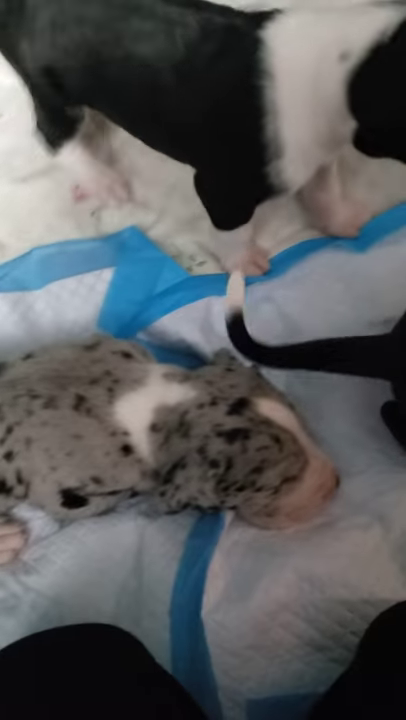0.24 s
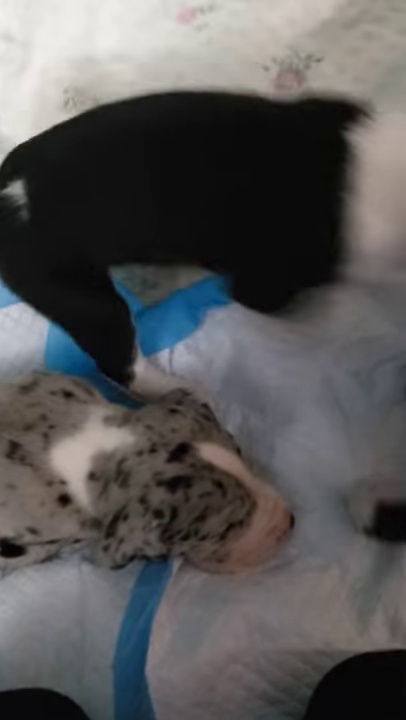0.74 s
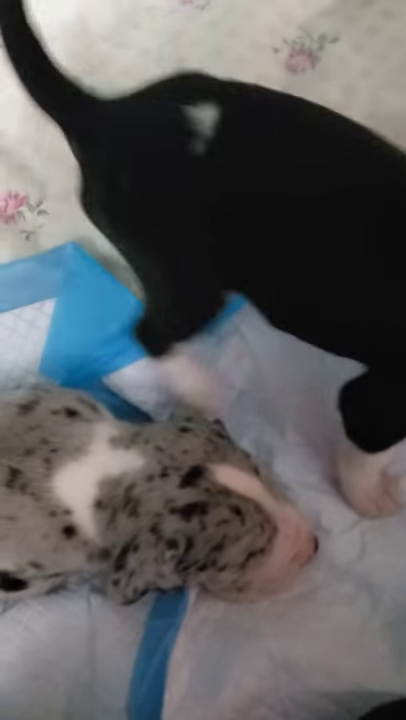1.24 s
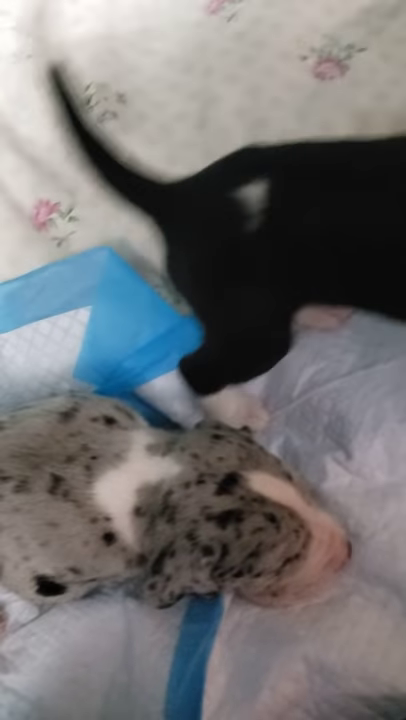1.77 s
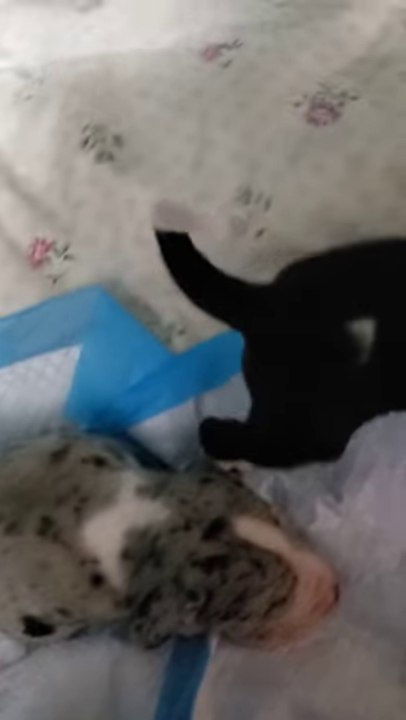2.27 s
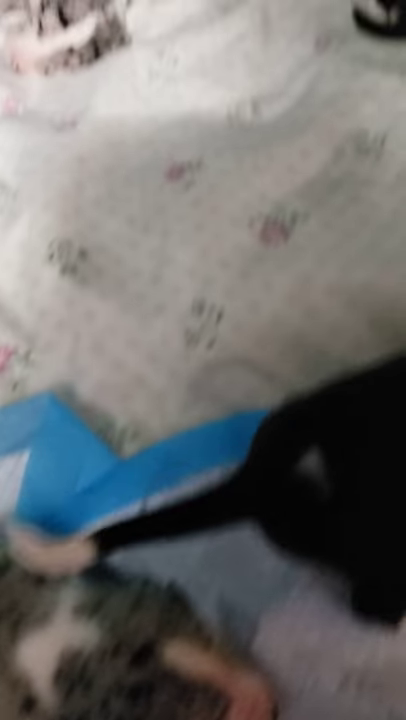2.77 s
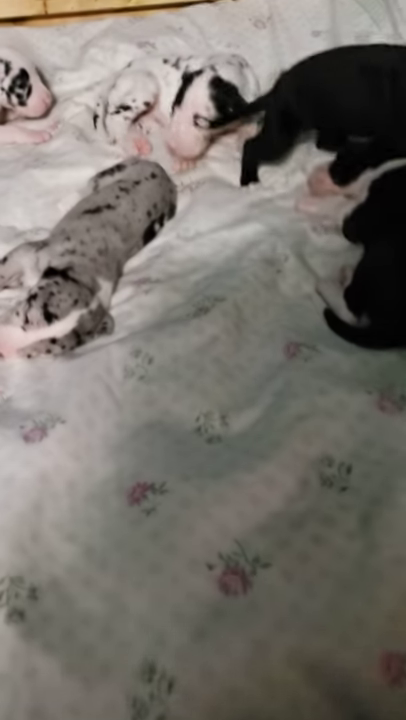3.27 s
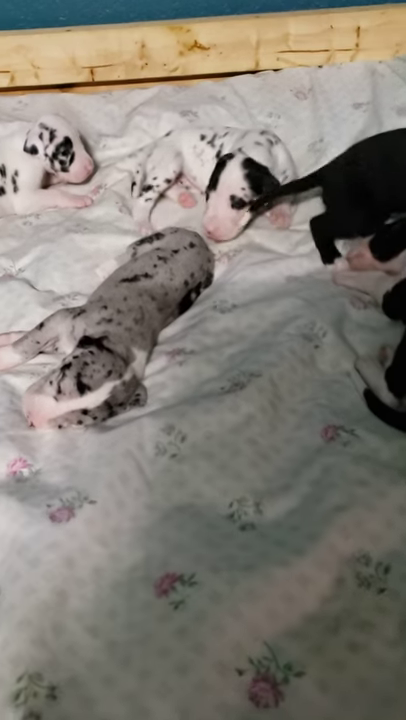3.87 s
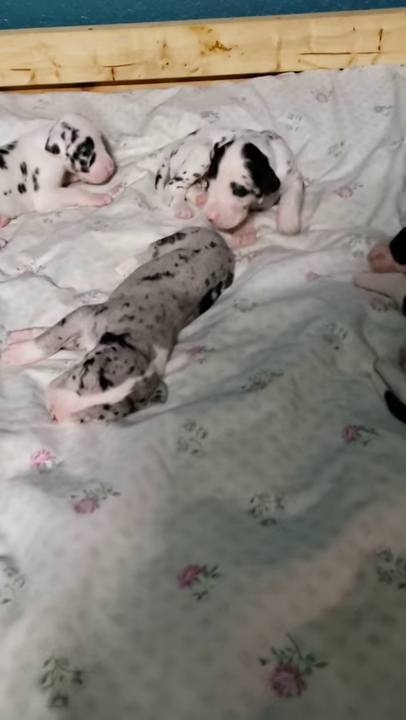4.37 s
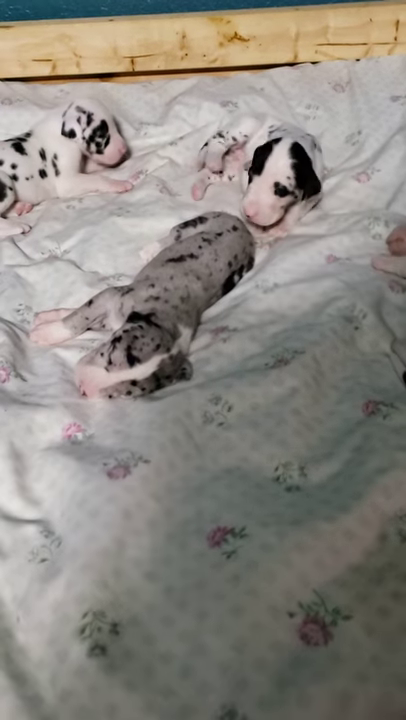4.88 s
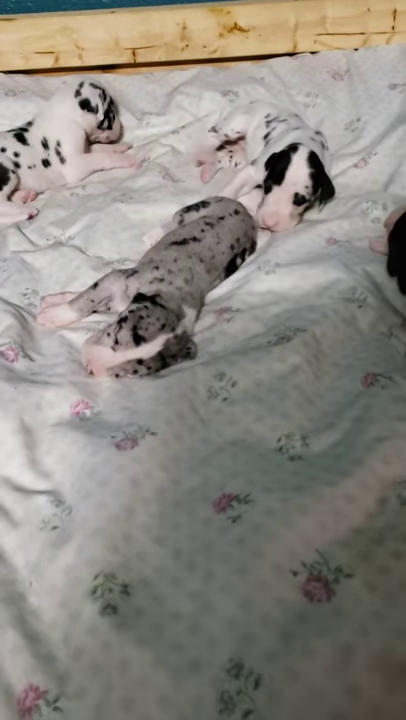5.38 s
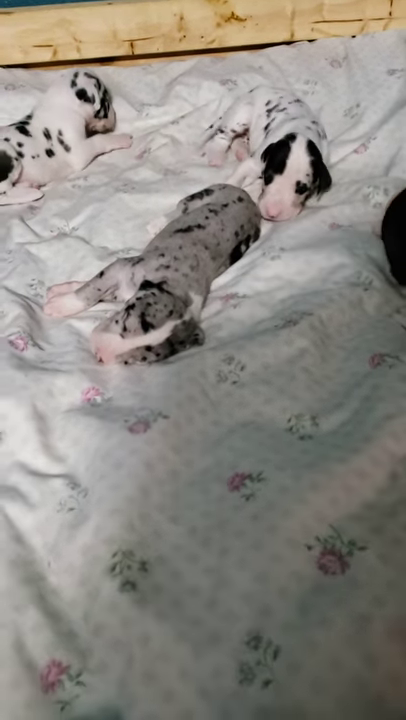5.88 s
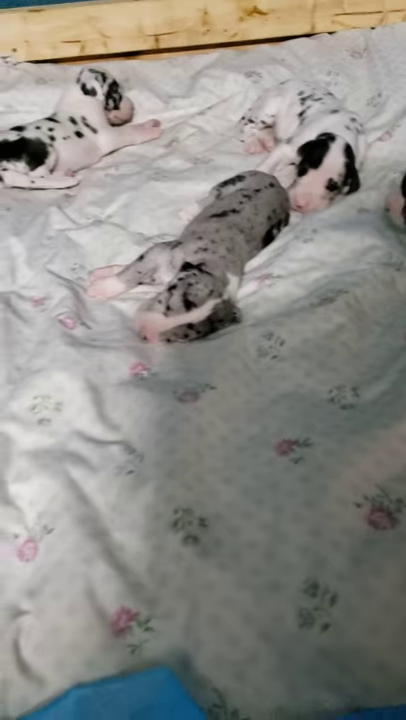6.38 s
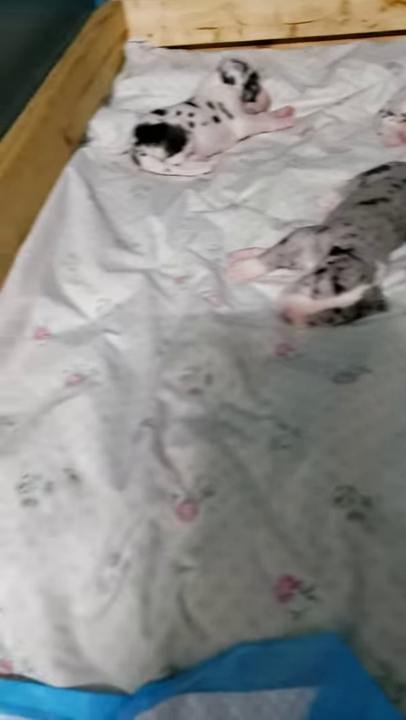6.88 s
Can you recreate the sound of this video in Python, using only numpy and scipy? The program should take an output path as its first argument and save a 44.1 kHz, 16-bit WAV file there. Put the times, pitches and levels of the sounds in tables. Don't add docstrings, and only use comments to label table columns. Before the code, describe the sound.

A quiet room with soft hiss and short close reflections; puppies call near a hand-held stereo phone. The tail of a whine and a low wavering nasal groan open, with a small high cry at 0.3 s running into a hoarse rising yelp until 0.6. A sagging groan follows to 1.5 while plastic padding snaps at 0.7, 0.8, 1.0 and 1.8, with rustles and dull, faint paw thumps. From 1.9 to 2.5 a thin whine climbs, fluttering; a whimper comes at 2.75. At 2.95 a loud piercing cry wavers up and down, breaking into a yelp at 3.55. A level whine leads to another leaping cry at 3.9, sinking roughly into a yelp by 4.3. A short groan at 4.45 precedes a long soft whine, 4.6-5.6, among small grunts. Gentle groans and a rising whine follow around 6; from 6.65 an open-mouthed groan swells, with a bright pad snap at 6.9.

```python
import sys
import numpy as np
from scipy import signal
from scipy.io import wavfile
from scipy.ndimage import uniform_filter1d, minimum_filter1d

SR = 44100
rng = np.random.default_rng(int(sys.argv[2]) if len(sys.argv) > 2 else 0)


def master_out(mix):
    frames = np.transpose(np.atleast_2d(mix))
    ceiling = np.clip(frames, -1, 1)
    pcm = np.round(ceiling * 32767).astype(np.int16)
    wavfile.write(sys.argv[1], SR, pcm)


def level_to_linear(level):
    exponent = np.asarray(level, float) / 20
    return 10 ** exponent


N = 314201


# start_s, pitch_hz, effort_db
CRIES = [
    [(.29, 1081, -58), (.315, 1125, -40.5), (.365, 1323, -36), (.4, 1321, -41.5), (.44, 1359, -53)],
    [(2.955, 552.7, -54), (2.972, 656.2, -39), (2.99, 787.2, -23), (3.022, 845.3, -23),
     (3.042, 798.7, -23.5), (3.084, 812.9, -26), (3.16, 1024, -21.5), (3.214, 974, -22.5),
     (3.255, 895.5, -26)] + [(3.28, 824, -26), (3.35, 818.2, -27.5), (3.422, 927.5, -24),
     (3.456, 978.8, -21), (3.506, 920.8, -22.5), (3.546, 843.6, -26.5), (3.57, 700.3, -35)],
    [(3.91, 512.3, -56), (3.93, 594, -41), (3.952, 976.5, -22), (3.976, 1143, -23), (4.008, 1194, -21),
     (4.046, 1065, -30.5), (4.1, 839, -32), (4.16, 607.8, -42.5)],
]
# left_lag_samples, left_minus_right_db
CRY_PLACE = [(-4.5, 2.5), (20, -4), (21, -5)]
# onset_rough_0_to_1, settled_rough_0_to_1, settling_s, tremor_hz, tremor_share
CRY_GRAIN = [(.4, .22, .1, 20, .015), (.2, .05, .03, 27, .009), (.3, .07, .03, 24, .006)]
CRY_FRAY = [0, .12, .75]
# pitch_hz, gain_db
CRY_LOW = [(520, 6.5), (810, 6.5), (950, -6), (1200, 14), (1330, -1), (1620, -5.5), (1950, -2.5),
           (2400, -14)]
# pitch_hz, level_db
CRY_THROAT = [(1060, -35.5), (1800, -5), (2070, 1), (2730, -11.5), (3100, -4), (4330, -14.5), (6130, -3),
              (6950, -28), (8040, -21.5), (9500, -46), (12400, -67.5), (20900, -120)]
# pitch_hz, gain_db
FIRST_CRY_LOW = [(1050, 10.5), (1330, 10), (2200, 7.5), (2650, -2)]
# pitch_hz, level_db
FIRST_CRY_THROAT = [(2700, -13), (3900, -1), (4500, -10), (5300, -15.5), (6500, -1), (7200, -19),
                    (9000, -18)]


def cries(mix):
    lows = [FIRST_CRY_LOW, CRY_LOW, CRY_LOW]
    throats = [FIRST_CRY_THROAT, CRY_THROAT, CRY_THROAT]
    for rows, place, grain, fray, low, throat in zip(CRIES, CRY_PLACE, CRY_GRAIN, CRY_FRAY, lows, throats):
        call = voice(rows, grain, low, (0, 0.3), throat, throb_db=1.2645, fray=fray)
        add(mix, rows[0][0], call, *place)


# start_s, pitch_hz, effort_db
YELPS = [
    [(.35, 319.8, -36.5), (.41, 340.9, -27.5), (.47, 437.1, -20), (.52, 361.6, -28), (.59, 298.5, -43)],
    [(3.55, 438.4, -30.5), (3.58, 439.2, -25.5), (3.63, 381.9, -27), (3.68, 414.9, -35), (3.74, 488, -55)],
    [(4.14, 430.6, -27), (4.17, 419.3, -33), (4.21, 390.5, -31.5), (4.255, 415.2, -38.5),
     (4.29, 392, -48.5)],
]
# onset_rough_0_to_1, settled_rough_0_to_1, settling_s, tremor_hz, tremor_share
YELP_GRAIN = [(.3, .62, .08, 30, .03), (.5, .15, .06, 30, .015), (.3, .14, .05, 30, .015)]
# pitch_hz, gain_db
YELP_LOW = [(300, -2), (400, -1), (435, -7.5), (680, -4), (790, 2), (870, -9)]
# pitch_hz, level_db
YELP_THROAT = [(900, 5), (1250, 6.5), (1700, 2.5), (2100, -6.5), (2800, -39), (3500, -9), (4300, -35),
               (5800, -13.5), (7500, -29), (9000, -37.5), (16000, -91)]
# pitch_hz, level_db
FIRST_YELP_THROAT = [(900, 0.5), (1400, 4.5), (1900, 3), (2600, -16.5), (3400, -9), (4300, -26.5),
                     (5300, -16), (6500, -25.5), (8000, -19.5), (12000, -48.5)]


def yelps(mix):
    throats = [FIRST_YELP_THROAT, YELP_THROAT, YELP_THROAT]
    for rows, place, grain, throat in zip(YELPS, CRY_PLACE, YELP_GRAIN, throats):
        call = voice(rows, grain, YELP_LOW, (0, 0.13), throat, throb_db=1.0)
        add(mix, rows[0][0], call, *place)


# start_s, pitch_hz, effort_db
WHINES = [
    [(0, 626.3, -39.5), (.1, 783, -58.5)],
    [(1.91, 550, -48.5), (2.0, 637, -42), (2.08, 700.6, -40), (2.15, 778, -40), (2.29, 965, -43.5),
     (2.31, 1028, -33), (2.41, 1094, -33.5), (2.46, 1240, -34), (2.54, 1239, -52.5)],
    [(2.74, 741.5, -41.5), (2.78, 783, -46.5), (2.81, 665, -58)],
    [(2.875, 1023, -60), (2.888, 1087, -37.5), (2.908, 1069, -47.5), (2.923, 914, -52),
     (2.935, 973.7, -34.5), (2.95, 1048, -44.5), (3.1, 1111, -36), (3.24, 1122, -39), (3.28, 1004, -67)],
    [(3.62, 1010, -39.5), (3.8, 930.2, -37.5), (3.86, 1011, -38), (3.94, 939, -38.5)],
    [(4.622, 881.6, -44.5), (4.7, 789.2, -40), (4.85, 742.7, -39), (4.97, 851.1, -41.5),
     (5.12, 791.5, -39.5), (5.3, 788.6, -40), (5.45, 854.8, -45), (5.55, 932.6, -45.5), (5.63, 991.4, -70)],
    [(5.94, 845.5, -44), (6.19, 880.6, -45), (6.39, 1004, -52)],
    [(6.74, 861, -67), (6.82, 871.3, -44.5), (6.95, 844, -66)],
]
# left_lag_samples, left_minus_right_db
WHINE_PLACE = [(-40, 4), (7.5, 2), (14.5, -2.5), (11.5, -16.5), (15.5, -1.5), (15.5, -3), (17, 2),
               (19, 18.5)]
# onset_rough_0_to_1, settled_rough_0_to_1, settling_s, tremor_hz, tremor_share
STEADY = (.08, .025, .08, 22, .005)
WHINE_GRAIN = [STEADY, (.8, .1, .1, 24, .1), (.25, .1, .04, 30, .02),
               STEADY, STEADY, (.22, .02, .3, 45, .05), STEADY, STEADY]
# pitch_hz, gain_db
WHINE_LOW = [(600, 3), (1250, -1), (1450, -6), (1600, -10), (1750, -26.5), (1950, -19.5), (2200, -30.5),
             (2550, -36)]
# pitch_hz, level_db
WHINE_THROAT = [(2500, -5), (3400, 0), (4450, -4), (5200, -20), (9000, -38.5)]


def whines(mix):
    for rows, place, grain in zip(WHINES, WHINE_PLACE, WHINE_GRAIN):
        call = voice(rows, grain, WHINE_LOW, (-32, .05), WHINE_THROAT, throb_db=1.5)
        add(mix, rows[0][0], call, *place)


# start_s, pitch_hz, effort_db
GROANS = [
    [(.02, 206.7, -47), (.05, 273.2, -46), (.1, 253.4, -40), (.14, 227.3, -45.5), (.28, 207.8, -41.5),
     (.38, 253, -41.5), (.63, 213, -45.5)],
    [(.62, 203.9, -54), (.66, 201.7, -45), (.8, 233.4, -44.5), (.92, 232.6, -41.5), (1.1, 196.4, -44),
     (1.29, 188.5, -48.5), (1.33, 170.1, -58.5), (1.46, 147.9, -55.5)],
    [(4.43, 317.3, -45), (4.5, 351.8, -36), (4.58, 329.7, -47), (4.62, 329.7, -100)],
    [(5.92, 195.5, -55.5), (5.98, 255.6, -38.5), (6.04, 191.7, -49.5), (6.11, 196.1, -55),
     (6.16, 277, -57.5), (6.19, 263, -66)],
    [(6.655, 207.6, -69), (6.68, 254.6, -43), (6.71, 313.1, -35.5), (6.8, 331.2, -32), (6.9, 347.2, -31),
     (7.0, 349, -30.5), (7.125, 341.6, -31.5)],
]
# start_s, rise_s, fall_s, peak_db, top_pitch_hz
GRUNTS = [
    (4.719, 0.1191, 0.1173, -37, 313.4),
    (5.08, 0.0369, 0.126, -46, 272.8),
    (5.368, 0.0111, 0.0395, -56, 200),
    (5.568, 0.0811, 0.0627, -39.5, 264.5),
    (6.351, 0.0834, 0.103, -36.5, 325.6),
]
# left_lag_samples, left_minus_right_db
GRUNT_PLACE = [(-7.5, -1.94), (-5, -1.32), (22.5, -1.5), (23.5, -0.5), (10.5, 2.5), (22, -6), (21.5, -1.5),
               (17, -3.5), (15.5, -0.5), (13, -3)]
# onset_rough_0_to_1, settled_rough_0_to_1, settling_s, tremor_hz, tremor_share
SHORT = (.3, .13, .04, 25, .014)
GRUNT_GRAIN = [(.2, .2, .3, 27, .06)] * 2 + [SHORT] * 7 + [(.4, .04, .07, 18, .014)]
GRUNT_MOUTH = [1.294, 0.918, 1.023, 0.974, 0.943, 0.69, 0.873, 0.9295, 1.083, 1.004]
# pitch_hz, gain_db
GRUNT_LOW = [(200, 1), (260, 1), (340, 0.5), (420, 7), (520, -1.5), (600, 5), (700, 5)]
# pitch_hz, level_db
NOSE = [(650, 3.5), (1000, -8.5), (1400, -5.5), (1750, -18), (2100, -36.5), (5000, -35.5), (16000, -33.5)]
# pitch_hz, level_db
GRUNT_THROAT = [(780, 11.5), (1040, -13), (1400, -1), (1750, -8), (2200, -11), (2800, -21.5), (3600, -10),
                (4700, -29), (5600, -22.5), (7500, -26), (9000, -38.5), (16000, -72)]


def groans_and_grunts(mix):
    nasal_calls = 6
    low_calls = sorted(GROANS + [grunt(*row) for row in GRUNTS])
    settings = zip(low_calls, GRUNT_PLACE, GRUNT_GRAIN, GRUNT_MOUTH)
    for number, (rows, place, grain, mouth) in enumerate(settings):
        if number < nasal_calls:
            upper, throat = (-2.5, 0.21), NOSE
        else:
            upper, throat = (-1.95, 0.133), GRUNT_THROAT
        call = voice(rows, grain, GRUNT_LOW, upper, throat, throb_db=1.5, mouth=mouth)
        add(mix, rows[0][0], call, *place)


# stage (0-1 share of the rise, 1-2 one plus share of the fall), pitch_share, level_db
GRUNT_SHAPE = [(0, .8, -24), (0.301, .85, -12.5), (1, 0.9854, 0), (1.6, .97, -5), (1.999, 0.843, -56)]


def grunt(start, rise, fall, peak_db, top_hz):
    rows = []
    for stage, share, down_db in GRUNT_SHAPE:
        s = start + rise * min(stage, 1) + fall * max(stage - 1, 0)
        rows.append((s, share * top_hz, peak_db + down_db))
    return rows


# start_s, end_s, pitch_hz, level_db
WHISTLES = [
    (2.275, 2.463, 13000, -46),
    (2.716, 2.791, 14240, -45.5),
    (2.92, 3.201, 13050, -41.5),
    (3.673, 3.766, 12940, -51.5),
    (3.828, 3.924, 13040, -47.5),
]


def whistles(mix):
    for start, end, hz, db in WHISTLES:
        t = np.arange(start, end, 1 / SR)
        turns = np.cumsum(hz * (1 + .004 * wobble(len(t), 300))) / SR
        level = level_to_linear(db + 3.6 * wobble(len(t), 450)) * signal.windows.tukey(len(t), .6)
        add(mix, start, level * np.sin(2 * np.pi * turns), lag=18, pan_db=-5.)


def voice(rows, grain, low, upper, throat, throb_db, mouth=1, fray=0):
    s, pitch, effort = np.transpose(rows)
    t = np.arange(s[0], s[-1], 1 / SR)
    n, age = len(t), t - s[0]
    hz, effort_db = glide(t, s, pitch), np.interp(t, s, effort)
    upper_db = effort_db + upper[0] + upper[1] * (effort_db - effort.max())
    low_db = effort_db + read(low, hz * [[1], [2]])

    onset, settled, settling, tremor_hz, depth = grain
    rough = settled + (onset - settled) * np.exp(-(age / settling) ** 2)
    rough += fray * (age / (s[-1] - s[0])) ** 3
    tremor = np.sin(2 * np.pi * np.cumsum(tremor_hz * (1 + 0.3024 * wobble(n, 891))) / SR)
    tremor *= depth * np.clip(rough / max(onset, settled) + .3, 0, 1)
    drift = 0.00734 * wobble(n, 400)
    jitter = 0.065 * rough * wobble(n, 84)
    hz = hz * (1 + tremor + drift + jitter)
    turns = np.cumsum(hz) / SR

    k = np.arange(1, int(10000 / hz.mean()) + 1)[:30, None]
    size = level_to_linear(read(throat, k * hz / mouth))
    size[2:] *= level_to_linear(upper_db) / np.sqrt((size[2:] ** 2).sum(0))
    size[:2] = level_to_linear(low_db)
    swells = np.array([wobble(n, 1200) for _ in range(5)])
    size[2:] *= level_to_linear(3.413 * swells[k[2:, 0] % 5])

    shimmer = np.array([wobble(n, .9 * SR / hz.mean()) for _ in range(8)])
    shimmer = shimmer.reshape(2, 4, -1)[:, k[:, 0] % 4]
    smear = np.clip(rough * (.5 + .05 * k ** 2), 0, 1)
    angle = 2 * np.pi * (k * turns + .04 * k ** 2)
    tone = np.sqrt(2 - 2 * smear ** 2) * np.cos(angle)
    tone += smear * (shimmer[0] * np.cos(angle) + shimmer[1] * np.sin(angle))
    halves = 1 + 0.26 * np.clip(rough - settled, 0, onset) * np.cos(np.pi * turns)
    edge = np.clip(np.minimum(age / 0.0021, (s[-1] - t) / 0.0022), 0, 1)
    throb = level_to_linear(throb_db * wobble(n, 440) + 30 * tremor)
    return (size * tone).sum(0) * halves * edge * throb


def glide(t, s, hz):
    slope = np.diff(hz) / np.diff(s)
    before, after = np.r_[slope[0], slope], np.r_[slope, slope[-1]]
    bend = np.where(before * after > 0, 2 * before * after / (before + after + 1e-9), 0)
    i = np.clip(np.searchsorted(s, t) - 1, 0, len(s) - 2)
    dt = t - s[i]
    u = dt / np.diff(s)[i]
    curve = (1 - u) * (bend[i] - slope[i]) + u * (slope[i] - bend[i + 1])
    return hz[i] + dt * (slope[i] + (1 - u) * curve)


def puppies():
    mix = np.zeros((2, N))
    for calls in (cries, yelps, whines, groans_and_grunts, whistles):
        calls(mix)
    return mix


# start_s, peak_db, pitch_hz
THUMPS = [
    (0.887, -55.5, 145),
    (1.209, -58.5, 198.7),
    (2.146, -62.5, 103),
    (4.465, -62, 104.6),
    (5.491, -65, 167.2),
]
# start_s, peak_db
SNAPS = [(0.6617, -31.5), (0.6841, -29), (0.778, -36.5), (1.041, -31), (1.3853, -49), (1.781, -36.5),
         (2.777, -40), (5.7825, -43), (5.829, -51.5), (6.2299, -46.5), (6.8754, -26.5)]


def paws():
    mix, t = np.zeros((2, N)), np.arange(5000) / SR
    for s, db, hz in THUMPS:
        swell = (t / 0.00228) * np.exp(1 - t / 0.01365)
        add(mix, s, level_to_linear(db) * np.sin(2 * np.pi * hz * t) * swell)
    bursts = np.diff(rng.standard_normal((len(SNAPS), 801)), axis=1)
    for (s, db), burst in zip(SNAPS, bursts):
        add(mix, s, level_to_linear(db - 9.5) * burst * np.exp(-t[:800] / 0.00137), lag=10, pan_db=-4.)
    return mix


# pitch_hz, level_db_per_hz
RUSTLE_COLOUR = [(18, -34.5), (30, -21), (204, -18.5), (404, -15), (584, -25.5), (866, -17.5), (1590, -21),
                 (7270, -16.5), (11400, -9), (16000, -8.5)]


def rustle():
    crackling, shuffling = stirring()
    grains_per_s = 900
    grains = level_to_linear(4.3 * np.minimum(rng.exponential(1, N), 5)) * (rng.random(N) < grains_per_s / SR)
    grains = 1 + .5 * evened(signal.lfilter([1], [1, -.99], grains))
    rub = noise(RUSTLE_COLOUR, patchy_db=1.5) * grains
    low = signal.sosfiltfilt(signal.butter(1, 600, fs=SR, output="sos"), rub)
    sides_db = np.array([[-2.5], [2.5]])
    crackle = evened(rub - low) * crackling * level_to_linear(8.5 + sides_db)
    return crackle + evened(low) * shuffling * level_to_linear(4.5)


# middle_s, length_s, crackle_db, shuffle_db
STIRS = [(0.188, 1, -87.5, -60.5), (0.734, 0.112, -52, -51.5), (0.903, 0.067, -54.5, -44),
         (1.191, 0.1433, -54, -46.5), (1.461, 0.133, -55.5, -50.5), (1.771, 0.1216, -59.5, -53),
         (1.982, 0.272, -61.5, -60), (2.187, 0.165, -53, -51.5), (2.71, 0.18, -83, -61.5),
         (3.238, 0.582, -56, -64.5), (4.002, 0.25, -56, -86.5), (4.475, 0.22, -61.5, -62),
         (5.847, 0.0259, -78.5, -58), (6.317, 0.298, -61.5, -70.5), (6.904, 0.083, -55, -56),
         (7.073, 0.173, -60.5, -60.5)]


def stirring():
    calm_db, calming_db_per_s = (-60.5, -68.5), (-1.97, 0.1825)
    fade_db, rise_share = 13.5, 0.63
    t = np.arange(0, N + 64, 64) / SR
    level = level_to_linear(np.array(calm_db)[:, None] + np.outer(calming_db_per_s, t))
    for s, length, *peak_db in STIRS:
        away = (t - s) / np.where(t < s, rise_share * length, length)
        level = np.hypot(level, level_to_linear(np.array(peak_db)[:, None] - fade_db * away ** 2))
    return [np.interp(np.arange(N) / SR, t, row) for row in level]


# pitch_hz, t60_s
ROOM = [(300, 0.148), (2000, 0.2066), (12000, 0.017)]


def room(x):
    taps = np.zeros((2, SR // 2))
    at = np.arange(150, SR // 2 - 20, 20) + rng.integers(0, 20, (2, (SR // 2 - 151) // 20))
    np.put_along_axis(taps, at, rng.choice([-1., 1.], at.shape), 1)
    hz, t, z = signal.stft(taps, SR, nperseg=256)
    decay = level_to_linear(-60 * t / read(ROOM, hz)[:, None])
    tail = signal.istft(z * decay, SR, nperseg=256)[1]
    return signal.fftconvolve(x, tail / np.linalg.norm(tail[0]), axes=1)[:, :N]


# pitch_hz, level_db_per_hz
HISS = [(18, -30.5), (30, -4.5), (170, -2.5), (1390, -16.5), (3770, -32), (11400, -3), (16000, -18.5)]


def hiss():
    return level_to_linear(-78) * evened(noise(HISS, patchy_db=6.5))


# pitch_hz, likeness_0_to_1
SAME = [(60, 1), (300, 0.92), (1500, 0), (15000, 0.058)]


def noise(colour, patchy_db):
    frames, hz = N // 128 + 6, np.fft.rfftfreq(512, 1 / SR)
    a, b, c, d, patches = rng.standard_normal((frames, 257, 5)).T
    patches = evened(uniform_filter1d(uniform_filter1d(patches, 20, 0), 12, 1))
    same = np.clip(read(SAME, hz), -1, 1)[:, None]
    left, other = a + 1j * b, c + 1j * d
    z = np.array([left, same * left + np.sqrt(1 - same ** 2) * other])
    z *= level_to_linear(read(colour, hz)[:, None] + patchy_db * patches)
    return signal.istft(z, nperseg=512, noverlap=384)[1][:, :N]


def evened(x):
    return x / np.sqrt(np.mean(x ** 2) + 1e-20)


def read(points, hz):
    f, value = np.transpose(points)
    return np.interp(np.log(hz + 1), np.log(f + 1), value)


def wobble(n, span):
    width = max(int(span), 2)
    return evened(uniform_filter1d(uniform_filter1d(rng.standard_normal(n), width), width))


def add(mix, s, sound, lag=0, pan_db=0):
    for ear, (late, db) in enumerate([(lag / 2, pan_db / 2), (-lag / 2, -pan_db / 2)]):
        part = mix[ear, max(round(s * SR + late), 0):][:len(sound)]
        part += level_to_linear(db) * sound[:len(part)]


def scene():
    near = puppies() + paws()
    walls = level_to_linear(-9.5) * room(near)
    return near + walls + rustle() + hiss()


def low_pass(x):
    return signal.sosfilt(signal.butter(12, 16590, fs=SR, output="sos"), x)


def record(dry):
    rounded = np.tanh(dry / 1.1222) * 1.0704
    heard = signal.sosfilt(signal.butter(2, 39, "high", fs=SR, output="sos"), rounded)
    treble_edge = signal.firwin(401, 15850, window=("kaiser", 9), fs=SR)
    heard = signal.oaconvolve(heard, treble_edge[None], "same")
    quiet_db, gate_slope, gate_depth_db = -55.5, 0.65, 9
    level_db = 10 * np.log10(abs(uniform_filter1d((heard ** 2).mean(0), size=1000)) + 1e-12)
    down_db = np.clip(gate_slope * (quiet_db - level_db), 0, gate_depth_db)
    down_db = uniform_filter1d(minimum_filter1d(down_db, size=600), size=600)
    return low_pass(heard / level_to_linear(down_db))


dry = scene()
out = record(dry)
master_out(out)
```